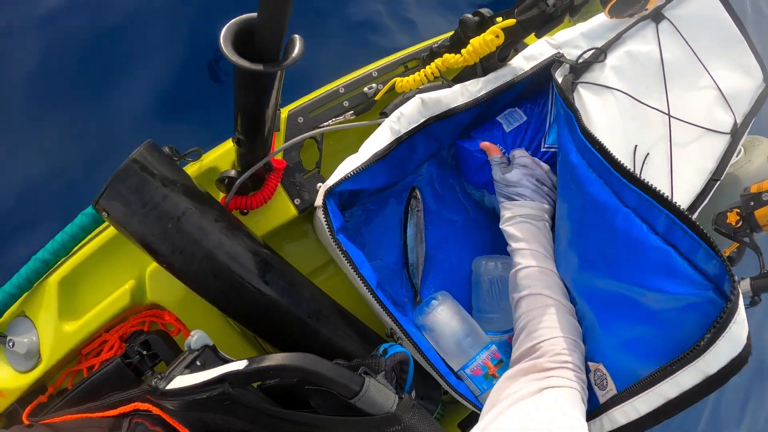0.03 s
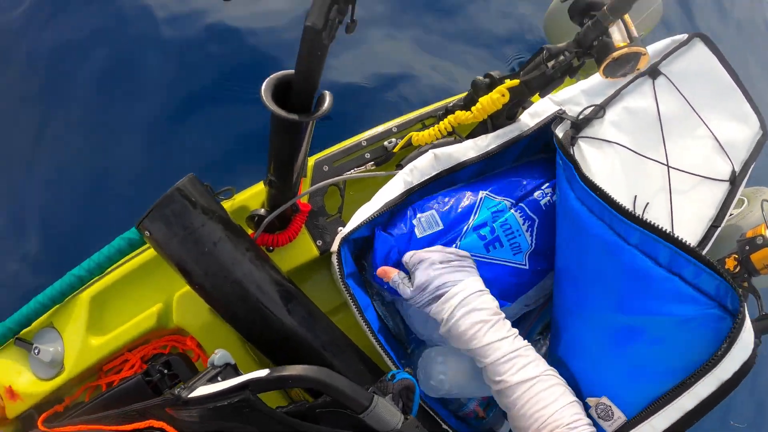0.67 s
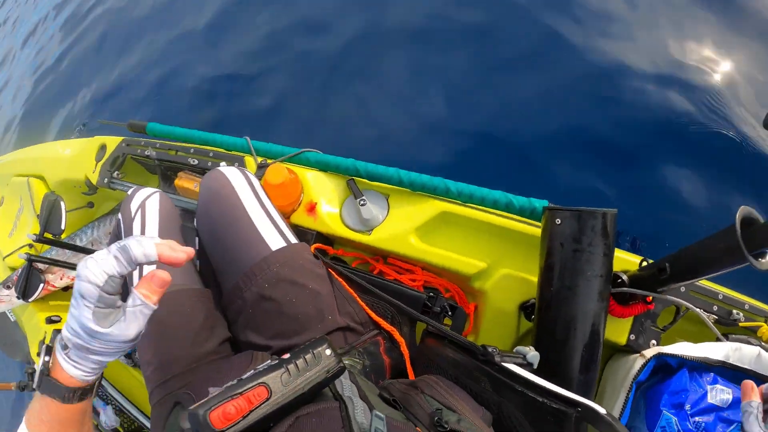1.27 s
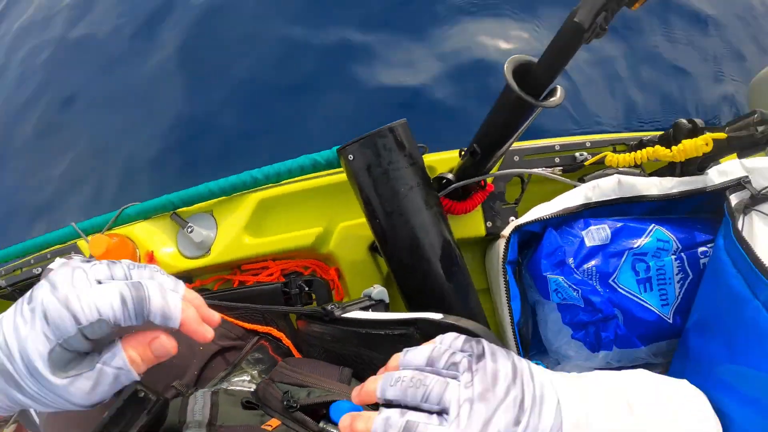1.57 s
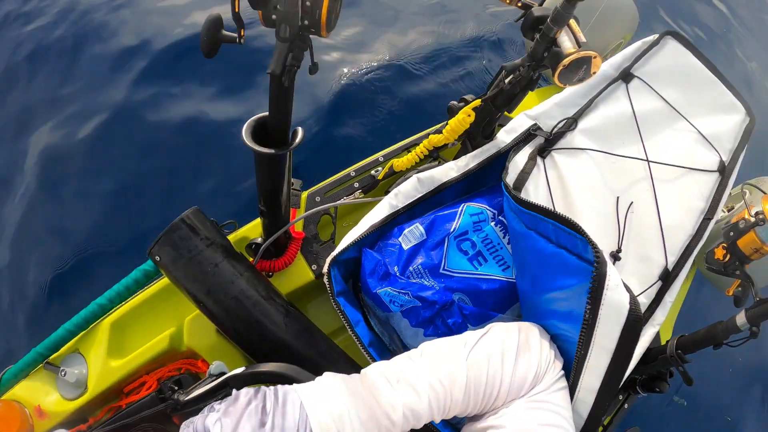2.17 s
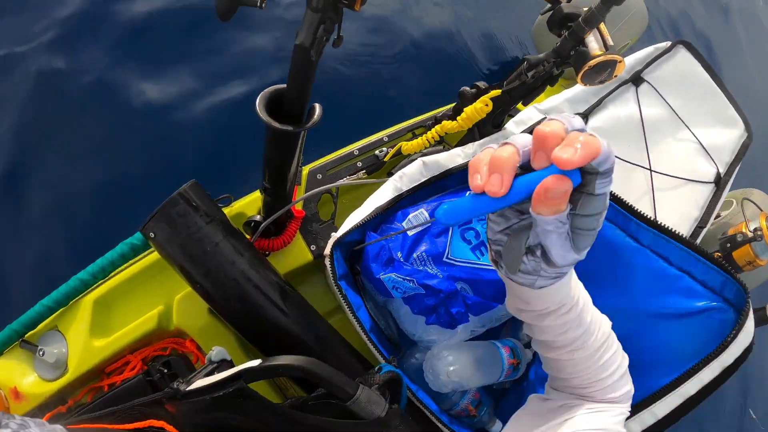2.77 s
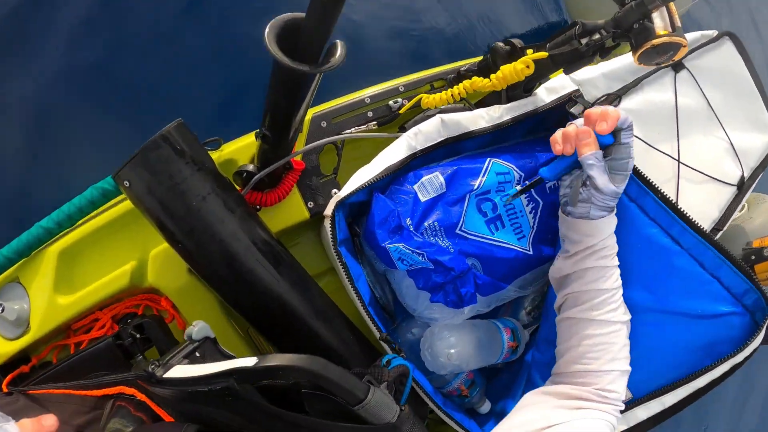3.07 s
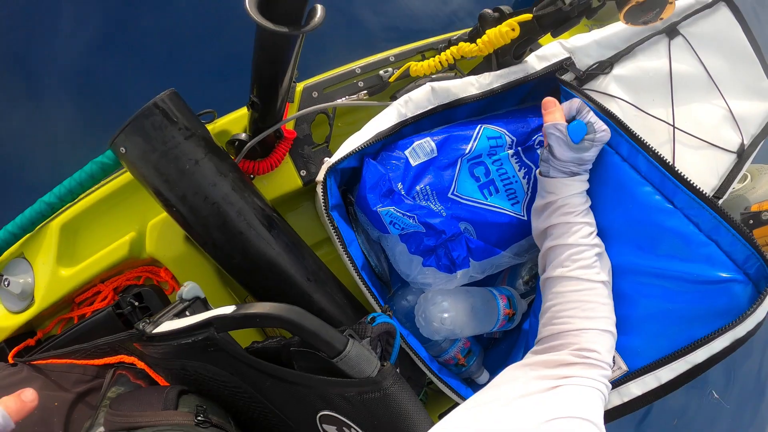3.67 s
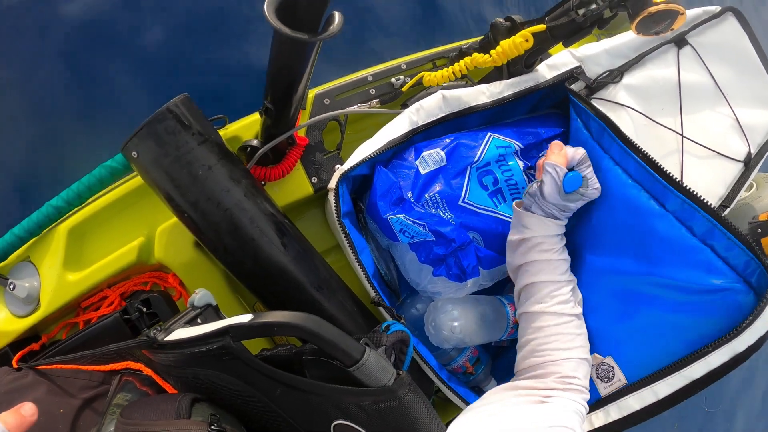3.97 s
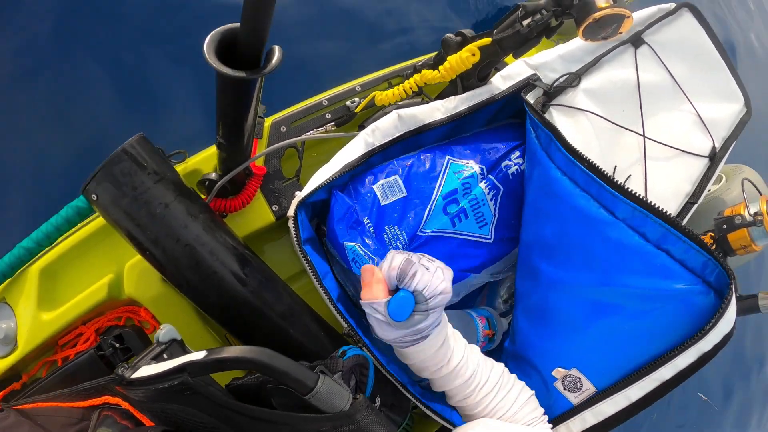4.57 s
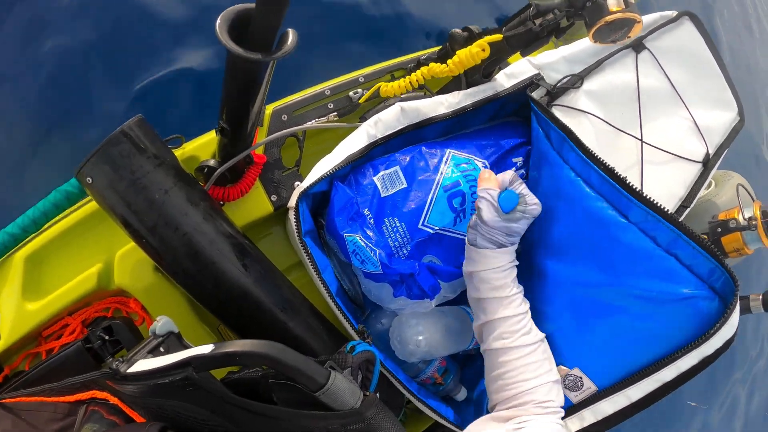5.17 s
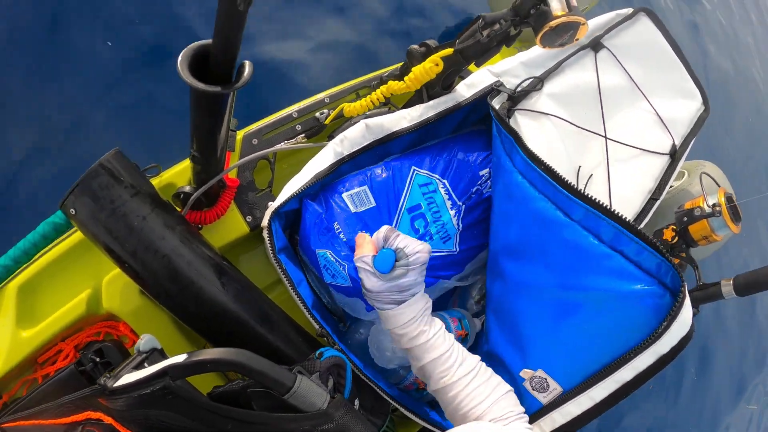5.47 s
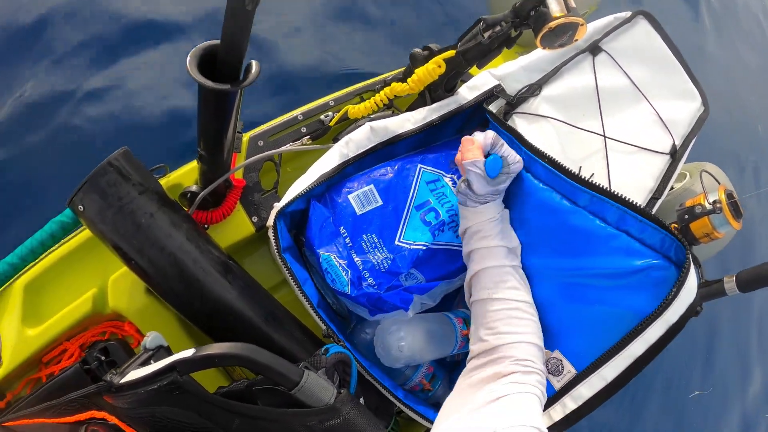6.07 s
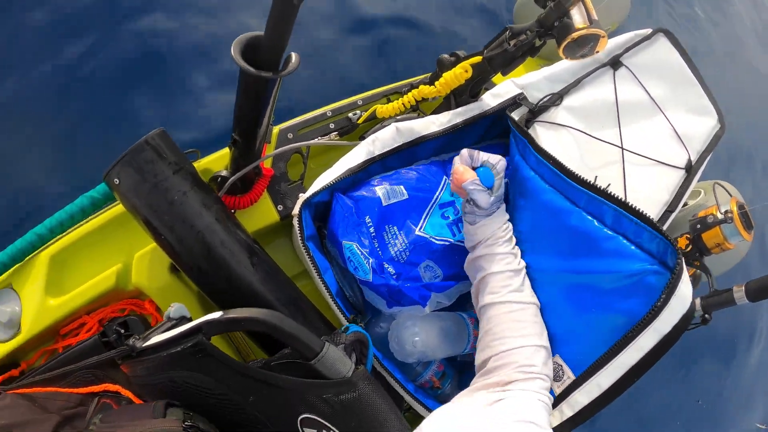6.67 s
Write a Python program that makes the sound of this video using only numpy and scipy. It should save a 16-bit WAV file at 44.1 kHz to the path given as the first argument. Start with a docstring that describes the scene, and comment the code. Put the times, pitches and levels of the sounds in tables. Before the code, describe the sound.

A plastic bag of ice is dragged inside a soft cooler, crinkling while cubes clack and the cooler thuds. A quieter stretch follows with sleeve rustle, a few knocks and short scrapes. Then a pick stabs the ice in quick, irregular clusters of crunches, with plastic snaps and hollow bumps. The microphone is close, on a kayak in calm water, with faint lapping and low gusts of wind.

```python
"""Breaking ice on a kayak

Calm open water, a body-worn stereo microphone close to a soft cooler. A plastic bag of ice is dragged
across it, a sleeve rustles as the arm fetches a pick, then stab after stab cracks the ice, shakes the
film and knocks cubes together. Water laps the hull and a breeze buffets the microphone ports."""
import sys
import numpy as np
from scipy import signal
from scipy.fft import rfft, irfft, next_fast_len
from scipy.io import wavfile
from scipy.ndimage import map_coordinates

SR = 44100
rng = np.random.default_rng(int(sys.argv[2]) if len(sys.argv) > 2 else 0)


def materialize(psi):
    """Save the field psi as 16-bit PCM at rate SR to the path in sys.argv[1].

    A 1-D psi becomes a single channel; in a 2-D psi each row is a channel.
    """
    bounded = np.clip(np.atleast_2d(psi).T, -1, 1)
    quanta = np.round(bounded * 32767).astype(np.int16)
    wavfile.write(sys.argv[1], SR, quanta)


N = 305613

# Rustle of the bag, dragged in two pulls over the cooler's lining: time_s, level_db
DRAG_RUSTLE = [(0, -34), (0.22, -32.5), (0.33, -37), (0.56, -28), (0.66, -37), (0.86, -34.5), (0.93, -49),
               (1.26, -53.5), (1.34, -72.5)]
# Rustle of the bag as the pick works about between stabs: time_s, level_db
PICK_RUSTLE = [(3.5, -106), (3.87, -45), (4.1, -76), (4.4, -40.5), (4.66, -47), (4.71, -91), (4.78, -49),
               (5.42, -46), (5.95, -57), (6.4, -65), (6.72, -37), (6.93, -41)]
# Rustle of the sleeve while the arm is away: time_s, level_db
SLEEVE_RUSTLE = [(1.38, -73.5), (1.52, -56), (1.74, -48.5), (1.92, -54.5), (3.1, -55), (3.22, -62.5),
                 (3.35, -53), (3.7, -62), (3.82, -70)]
# Arm and pick scrape the gear: middle_s, length_s, level_db
SCRAPES = [(2.375, 0.091, -31.5), (2.493, 0.016, -38), (2.598, 0.038, -37.5), (2.929, 0.056, -39),
           (3.684, 0.097, -40), (6.029, 0.038, -43.5)]
# Breeze at the microphone: time_s, level_db
GUSTS = [(0.0, -27), (0.3, -39.5), (0.42, -24.5), (0.7, -23), (0.96, -40.5), (3.4, -44), (4.64, -36.5),
         (4.9, -21.5), (5.75, -31), (6.05, -41), (6.93, -34)]
# Two hard pieces meet: start_s, level_db, pitch_hz
HARD_CONTACTS = [(0.064, -17, 3150), (0.147, -16, 600), (0.173, -14, 1645), (0.374, -18.5, 3380),
                 (0.409, -10, 626), (1.288, -29.5, 2210), (1.864, -24.5, 666), (1.983, -30, 1690),
                 (2.027, -30.5, 900), (2.512, -23, 424), (3.265, -29.5, 1470), (4.772, -37, 2750),
                 (5.711, -37, 2760), (5.748, -15.5, 2820), (6.553, -24, 1530)]
# Ice cracks, or ice and gear get bumped: start_s, length_s, crack_db, knock_db
CRUNCH_HITS = [(0.198, .032, -30.5, -30.5), (0.345, 0.013, -22, -24.5), (0.527, 0.016, -28.5, -26),
               (0.986, 0.017, -27, -22), (1.158, 0.025, -28, -26.5), (1.812, 0.003, -38, -22.5),
               (2.37, 0.0041, -30, -29.5), (3.415, 0.0068, -25, -23.5), (3.434, .007, -38, -27),
               (3.825, 0.012, -33, -36.5), (3.964, 0.017, -24, -25), (4.024, .018, -21.5, -22),
               (4.115, 0.0055, -25.5, -27), (4.145, 0.029, -22.5, -24.5), (4.227, 0.0062, -22.5, -21.5),
               (4.246, 0.014, -22.5, -22), (4.292, 0.013, -21, -21.5), (4.327, 0.016, -21, -21),
               (4.36, .004, -22, -25), (4.38, 0.0093, -24, -22.5), (4.401, 0.0042, -26.5, -27),
               (4.414, 0.014, -22.5, -18.5), (4.501, 0.0043, -44, -25), (4.506, 0.0057, -23, -20),
               (4.572, 0.012, -30, -30), (4.933, 0.04, -22.5, -27.5), (5.084, 0.027, -22.5, -26.5),
               (5.187, 0.016, -22.5, -22), (5.291, .013, -20.5, -23), (5.327, 0.0046, -21, -22),
               (5.358, 0.033, -29.5, -32), (5.397, 0.016, -20, -21), (5.583, 0.0022, -16.5, -27.5),
               (5.589, 0.022, -21.5, -38), (5.617, .027, -23.5, -23), (5.755, 0.029, -33.5, -42.5),
               (6.446, 0.037, -24, -24.5), (6.65, 0.0054, -22, -25.5), (6.673, 0.0048, -21.5, -27),
               (6.708, 0.01, -21, -24.5), (6.73, 0.012, -25.5, -22.5), (6.774, 0.0027, -26.5, -18.5),
               (6.808, 0.0023, -17.5, -28), (6.82, 0.018, -23.5, -29.5), (6.851, 0.0099, -22.5, -34.5)]
# Low hollow thuds on cooler or hull: start_s, level_db, pitch_hz
HOLLOW_THUDS = [(0.435, -15.5, 146), (0.536, -18, 200), (0.639, -14.5, 149), (0.873, -16.5, 270),
                (1.827, -19.5, 195), (4.995, -18, 139), (5.317, -8, 146), (5.404, -10.5, 119),
                (5.543, -15.5, 120), (5.756, -21, 109), (5.815, -26.5, 248)]
# Single creases in the plastic flip over: start_s, level_db
CREASE_FLIPS = [(0.987, -24.5), (3.995, -24), (4.475, -21), (4.798, -29.5), (5.256, -22.5), (6.625, -22.5)]
# A scrape catches: middle_s, length_s, level_db, pitch_hz
CATCHES = [(2.347, 0.04, -37, 1070), (2.629, 0.024, -34, 1417)]

# Spectrum of each source: frequency_hz, gain_db
FILM_SPECTRUM = [(400, -12), (950, -1.5), (2850, 2), (3400, -3.5), (4600, -3.5), (9500, -15.5),
                 (13500, -29), (15800, -73)]  # crinkling plastic
LOAD_SPECTRUM = [(40, 0), (130, -2), (350, -4), (620, -4.5), (1000, -16.5), (2200, -34), (9000, -108)]  # packed cubes and dull knocks
RASP_SPECTRUM = [(650, 0), (1200, 3), (1950, -1.5), (2700, 1), (3400, -7), (5000, -9), (7200, -17),
                 (9000, -17), (15800, -44)]  # cloth and hard contacts
HULL_SPECTRUM = [(25, -4), (170, -2.5), (600, -25.5), (15000, -107)]  # water on the hull
WIND_SPECTRUM = [(15, -3.5), (70, 8.5), (160, -2), (2000, -61)]  # eddies on the ports
CRACK_SPECTRUM = [(350, -4), (900, -2), (1650, 4), (2850, 3), (3400, -3), (4600, -2.5), (5700, -11),
                  (9600, -21), (15800, -47)]  # crunches
# Shading of the left microphone port: frequency_hz, left_minus_right_db
PORT_SHADE = [(1300, -3), (2700, -.5), (3300, -3.5), (7000, -4.5), (12000, -11)]

CHUNK_HZ = 1656  # typical ring of a chunk that cracks and knocks equally hard


def amp(db):
    """Decibels to gain."""
    return 10 ** (np.asarray(db) / 20)


def unit(x):
    """Scale to rms 1."""
    return x / np.sqrt(np.mean(x ** 2) + 1e-20)


def along(points, hz):
    """Interpolate a spectrum on a log frequency axis."""
    frequency_hz, gain_db = np.transpose(points)
    return np.interp(np.log(hz + 1), np.log(frequency_hz + 1), gain_db)


def curve(rows):
    """Join (time_s, level_db) points into one level per sample."""
    return np.interp(np.arange(N) / SR, *np.transpose(rows))


def wobble(rate_hz):
    """A smooth random curve with rate_hz knots a second."""
    knots = rng.standard_normal(int(N * rate_hz / SR) + 4)
    return map_coordinates(knots, [np.arange(N) * rate_hz / SR])


def coloured(x, gain_db):
    """Minimum-phase filter with the gain gain_db(hz), so nothing sounds before a blow."""
    n = x.shape[-1]
    m = 2 * next_fast_len(n // 2 + SR // 20)
    cepstrum = irfft(np.log(amp(gain_db(np.fft.rfftfreq(m, 1 / SR)))), m)
    fold = 1 + np.sign(m // 2 - np.arange(m)) * (np.arange(m) > 0)
    return irfft(rfft(x, m) * np.exp(rfft(cepstrum * fold)), m)[..., :n]


def shaped(x, spectrum):
    """Filter x by a spectrum and scale to rms 1."""
    return unit(coloured(x, lambda hz: along(spectrum, hz)))


def add(track, start_s, sound):
    """Mix a sound into a track."""
    room = track[:, max(round(start_s * SR), 0):][:, :sound.shape[-1]]
    room += sound[..., :room.shape[-1]]


def swell(middle_s, length_s, level_db, edge_db=12):
    """Gain of a stroke that swells to its middle and fades again."""
    return amp(level_db - edge_db * np.abs(np.arange(N) / SR - middle_s) / (length_s / 2))


def snaps(times_s, sizes, n, t60_s, spread_us, lag_us=33.4, width=288):
    """Tiny bursts, each from its own spot and so with its own delay between the ports."""
    k = np.arange(width)
    bursts = rng.standard_normal((len(times_s), width)) * amp(-60 * k / SR / t60_s) * sizes[:, None]
    spectra = rfft(bursts, 2 * width)
    lag_s = (lag_us + spread_us * rng.standard_normal((len(times_s), 1))) * 1e-6
    half_delay = np.exp(-1j * np.pi * lag_s * np.fft.rfftfreq(2 * width, 1 / SR))
    ports = [np.roll(irfft(spectra * shift), width // 16, axis=1)[:, :width]
             for shift in (half_delay, half_delay.conj())]
    where = ((times_s * SR).astype(int)[:, None] + k).ravel()
    return np.array([np.bincount(where, port.ravel(), n)[:n] for port in ports])


def agitation(drag_db=-2.5, shake_db=-12, tighten_db_per_s=1391, settle_db_per_s=357):
    """The film's rustle in dB: drag, pick, and a tightening before and settling after each crunch."""
    t = np.arange(N) / SR
    power = amp(curve(DRAG_RUSTLE) + drag_db) ** 2 + amp(curve(PICK_RUSTLE)) ** 2
    for start_s, length_s, crack_db, _ in CRUNCH_HITS:
        near = slice(max(int((start_s - .5) * SR), 0), int((start_s + .5) * SR))
        before_db = tighten_db_per_s * (start_s + length_s / 2 - t[near])
        after_db = settle_db_per_s * (t[near] - start_s - length_s)
        fall_db = np.maximum(before_db, after_db).clip(min=0)
        power[near] += amp(crack_db + shake_db - fall_db) ** 2
    return 10 * np.log10(power)


def bag(clink_db=-6.5, load_db=-1, buckle_db=4.5, hard_db=-32, crisp_db=5):
    """The film buckles in snaps, denser and brighter when moved hard; the cubes slide and clink."""
    rustle_db = agitation()
    force = 1 / (1 + amp(hard_db - rustle_db) ** 2)
    folds = rng.integers(0, N, N // 32)
    sizes = amp(buckle_db * np.minimum(rng.exponential(size=len(folds)), 4.5))
    buckles = rng.random(len(folds)) < force[folds] ** .25
    film = shaped(snaps(folds / SR, sizes * buckles, N, t60_s=0.021, spread_us=12.4), FILM_SPECTRUM)
    taut = coloured(film, lambda hz: crisp_db * hz ** 2 / (hz ** 2 + 3000 ** 2))
    crinkle = film + force * (taut - film)
    cubes = amp(clink_db) * np.sqrt(force) * clinks() + amp(load_db) * tumble()
    return amp(rustle_db) * (crinkle + cubes)


def ring(pitch_hz, t60_s=0.022, rasp_db=-21, rasp_t60_s=0.02):
    """One contact between hard pieces: a dull rasp and a note that dies at once."""
    t = np.arange(SR // 20) / SR
    rasp = shaped(rng.standard_normal(len(t)) * amp(-60 * t / rasp_t60_s), RASP_SPECTRUM)
    note = np.sin(2 * np.pi * pitch_hz * t) * amp(-60 * t / t60_s)
    return note + amp(rasp_db) * np.sqrt(pitch_hz / CHUNK_HZ) * rasp


def clinks(count=400, low_hz=750, octaves=2.2, range_db=21):
    """Loose cubes touch at random; each rings briefly at its own pitch."""
    track = np.zeros((1, N))
    for when, pitch, size in rng.random((count, 3)):
        add(track, when * N / SR, amp(range_db * size) * ring(low_hz * 2 ** (octaves * pitch)))
    return unit(track)


def tumble(lumps_db=3.5):
    """Packed cubes roll over each other in dull lumps."""
    return shaped(rng.standard_normal(N) * amp(lumps_db * np.tanh(wobble(90))), LOAD_SPECTRUM)


def fabric(drag_db=-3, flutter_db=3, load_db=-2, clink_db=-7, press_db=-8, press_hz=3300):
    """Lining and sleeve rustle finely, duller where a scrape presses; nudged cubes roll and clink."""
    drag = amp(curve(DRAG_RUSTLE))
    sleeve = amp(curve(SLEEVE_RUSTLE) + 2.6 * wobble(12))
    scrape = sum(swell(*stroke) for stroke in SCRAPES)
    fibres = shaped(rng.standard_normal(N) + rng.standard_normal((2, N)) / 2, RASP_SPECTRUM)
    pressed = coloured(fibres, lambda hz: press_db * hz ** 2 / (hz ** 2 + press_hz ** 2))
    rustle = amp(flutter_db * wobble(60)) * ((amp(drag_db) * drag + sleeve) * fibres + scrape * pressed)
    rolling = (drag + sleeve + scrape) * amp(load_db) * tumble()
    return rustle * amp([[1.8], [-1.8]]) + rolling + amp(clink_db) * sleeve * clinks()


def water(level_db=-41):
    """Small waves murmur against the hollow hull."""
    lapping = amp(level_db + 3.1 * np.tanh(wobble(11)))
    return lapping * shaped(rng.standard_normal(N), HULL_SPECTRUM)


def breeze(gain_db=-2, calm_db=-42):
    """Eddies hit each microphone port separately, the right one harder, and fade in the lulls."""
    gust_db = curve(GUSTS)
    eddies = rng.standard_normal((2, N)) * amp(4 * np.tanh([wobble(39), wobble(39)]))
    gust = amp(gust_db + gain_db) / (1 + amp(calm_db - gust_db) ** 2)
    return gust * shaped(eddies, WIND_SPECTRUM) * amp([[-8], [3]])


def clacks():
    """Single hard pieces knock together, each at its own pitch."""
    track = np.zeros((1, N))
    for start_s, level_db, pitch_hz in HARD_CONTACTS:
        add(track, start_s, amp(level_db) * ring(pitch_hz))
    return track


def crack(length_s, bright_db, ring_hz, n, rate_hz=900, scatter_db=3, ring_db=5, width_hz=300):
    """A run of fine snaps builds up and spends itself; the struck piece rings briefly."""
    count = 1 + int(length_s * rate_hz)
    step = np.arange(count)
    times_s = (step + rng.uniform(-.5, .5, count) * (step > 0)) * length_s / count
    arch = np.sin(np.pi * (step + 1) / (count + 2)) ** .5
    sizes = amp(scatter_db * rng.standard_normal(count)) * arch
    run = snaps(times_s, sizes, n, t60_s=0.0067, spread_us=21.3)
    chunk = lambda hz: ring_db / (1 + ((hz - ring_hz) / width_hz) ** 2)
    shelf = lambda hz: bright_db * hz ** 4 / (hz ** 4 + 4500 ** 4)
    return unit(coloured(run, lambda hz: along(CRACK_SPECTRUM, hz) + chunk(hz) + shelf(hz)))


def knock(length_s, n, t60_s=0.049, blow_db=-3.5, boom_db=5, boom_hz=500):
    """Ice or gear grinds briefly and lands one solid blow; each knock booms at its own pitch."""
    t = np.arange(n) / SR
    envelope = np.minimum(2 * t / length_s, 1) * amp(-60 * np.maximum(t - length_s, 0) / t60_s)
    push = rng.standard_normal(n) * envelope
    blow_at = int(length_s * SR * rng.uniform(.5, 1))
    push[blow_at] -= amp(blow_db) * np.linalg.norm(push)
    pitch_hz = boom_hz * 2 ** rng.uniform(-1.105, 1)
    boom = lambda hz: boom_db / (1 + (10 * (hz / pitch_hz - 1)) ** 2)
    return unit(coloured(push, lambda hz: along(LOAD_SPECTRUM, hz) + boom(hz)))


def crunches(db_per_octave=10, scatter_octaves=0.39):
    """Ice cracks, or ice and gear get bumped: a crunch over a dull knock; lighter pieces ring higher."""
    track, n = np.zeros((2, N)), SR // 10
    for start_s, length_s, crack_db, knock_db in CRUNCH_HITS:
        lightness_db = crack_db - knock_db
        bright_db = 0.66 * (crack_db + 38.5) + 0.4 * lightness_db  # hard hits and chips are brighter
        ring_hz = CHUNK_HZ * 2 ** (lightness_db / db_per_octave + scatter_octaves * rng.standard_normal())
        sound = amp(crack_db) * crack(length_s, bright_db, ring_hz, n)
        sound += amp(knock_db) * knock(length_s, n)
        add(track, start_s, sound * np.sqrt(length_s * SR / n))
    return track


def thuds(attack_s=0.0014, t60_s=0.03, upper_ratio=1.6, upper_db=-5, second_s=0.017, second_db=0.5):
    """Cooler or hull booms in two low modes: a hollow thud with a quick second bump."""
    track, t = np.zeros((1, N)), np.arange(SR // 4) / SR
    envelope = (1 - np.exp(-t / attack_s)) * amp(-60 * t / t60_s)
    for start_s, level_db, pitch_hz in HOLLOW_THUDS:
        for delay_s, gain_db in (0, 0), (second_s, second_db):
            lower = np.sin(2 * np.pi * pitch_hz * t)
            upper = amp(upper_db) * np.sin(2 * np.pi * (upper_ratio * pitch_hz * t + rng.uniform()))
            add(track, start_s + delay_s, amp(level_db + gain_db) * envelope * (lower + upper))
    return track


def creases(gain_db=2, tilt_db=3):
    """A crease flips with one dry snap, brighter than the steady rustle."""
    start_s, level_db = np.transpose(CREASE_FLIPS)
    pops = snaps(start_s, amp(level_db + gain_db), N, t60_s=0.02, spread_us=15, lag_us=32)
    return coloured(pops, lambda hz: along(FILM_SPECTRUM, hz) + tilt_db * np.log2(1 + hz / 2000))


def squeaks(roughness=0.089, octave_db=-7):
    """A scrape catches and slips at an unsteady rate: a hoarse note and its octave."""
    track = np.zeros(N)
    for middle_s, length_s, level_db, pitch_hz in CATCHES:
        phase = 2 * np.pi * np.cumsum(pitch_hz * (1 + roughness * wobble(600))) / SR
        note = np.sin(phase) + amp(octave_db) * np.sin(2 * phase)
        track += swell(middle_s, length_s, level_db) * note
    return track


def reflections(x, t60_s=0.23, wet_db=-15.5):
    """The nearby cooler walls and deck scatter a very short tail."""
    t = np.arange(SR // 8) / SR
    scatter = rng.standard_normal((2, len(t))) * amp(-60 * t / t60_s) * (t > .002)
    tail = unit(scatter) / np.sqrt(len(t))
    return x + amp(wet_db) * signal.fftconvolve(x, tail, axes=1)[:, :N]


def scene():
    """On the kayak, the cooler lies close on the microphone's right, so the left port is shaded."""
    close = reflections(crunches() + creases() + clacks() + thuds() + bag() + fabric() + squeaks())
    left = coloured(close[0], lambda hz: along(PORT_SHADE, hz) / 2)
    right = coloured(close[1], lambda hz: -along(PORT_SHADE, hz) / 2)
    return np.array([left, right]) + water() + breeze()


def record(dry, top_hz=16000):
    """The body camera keeps nothing above its band limit."""
    m = next_fast_len(N + SR // 2)
    passband = np.fft.rfftfreq(m, 1 / SR) < top_hz
    return irfft(rfft(dry, m) * passband, m)[:, :N]


dry = scene()
out = record(dry)
materialize(out)
```